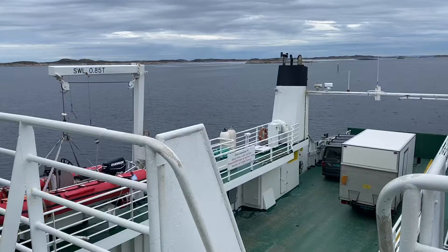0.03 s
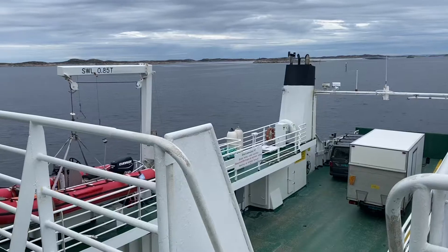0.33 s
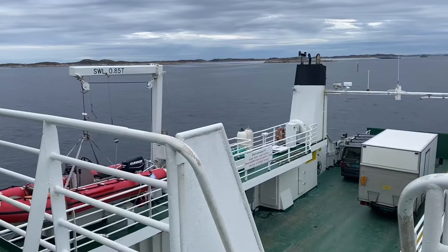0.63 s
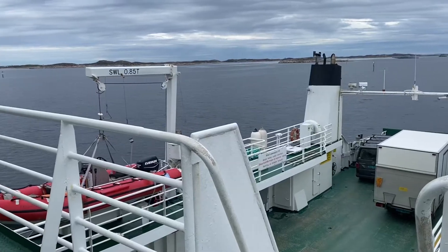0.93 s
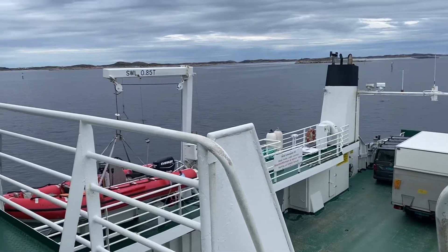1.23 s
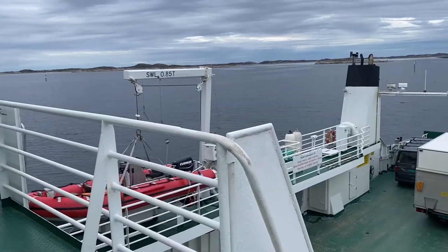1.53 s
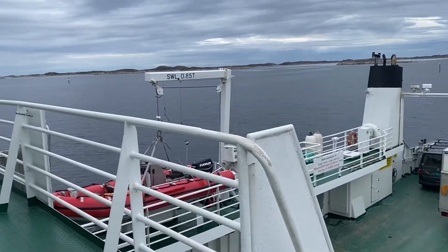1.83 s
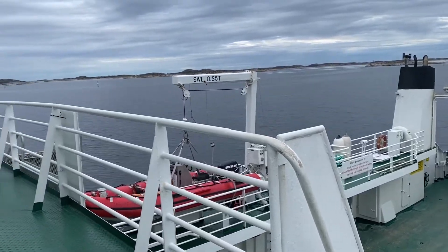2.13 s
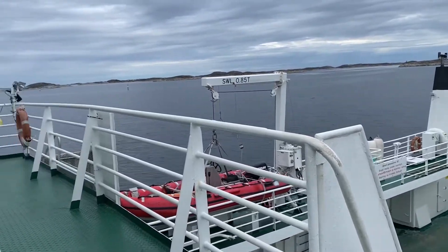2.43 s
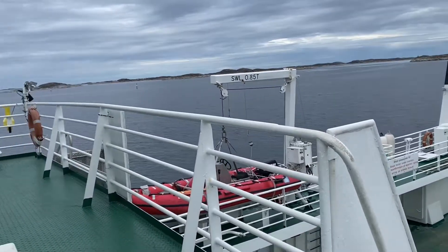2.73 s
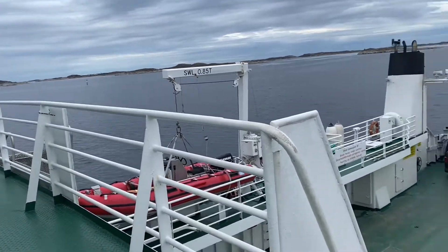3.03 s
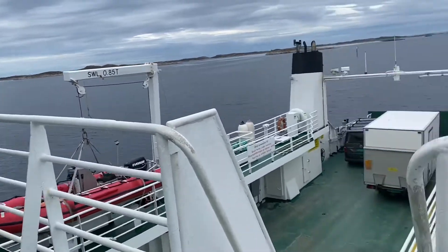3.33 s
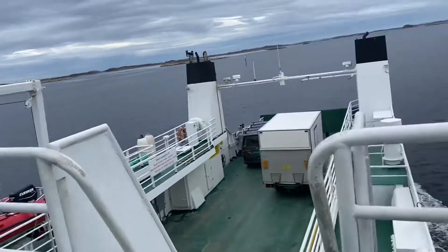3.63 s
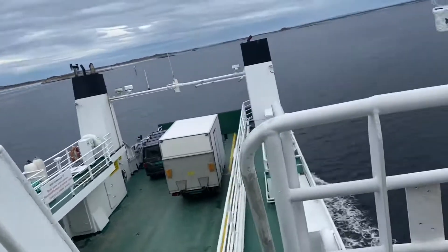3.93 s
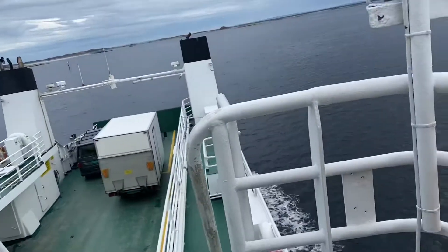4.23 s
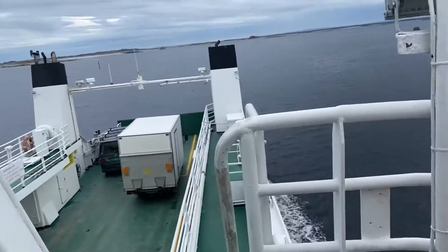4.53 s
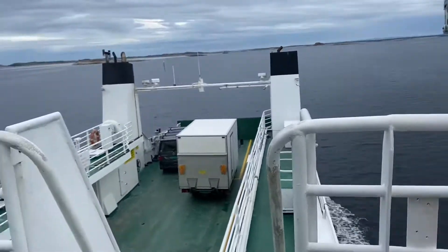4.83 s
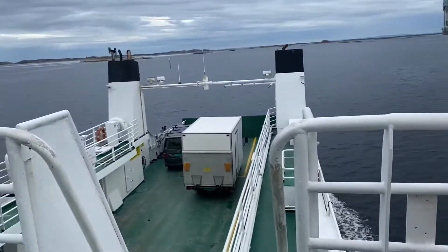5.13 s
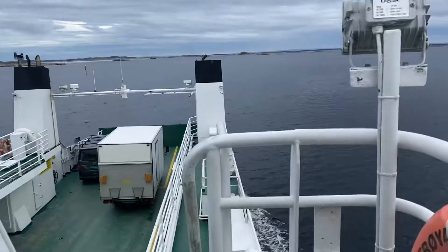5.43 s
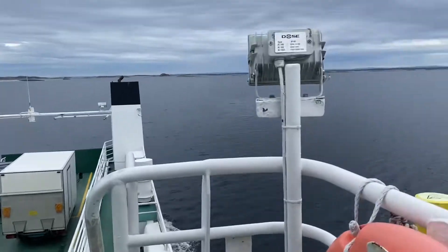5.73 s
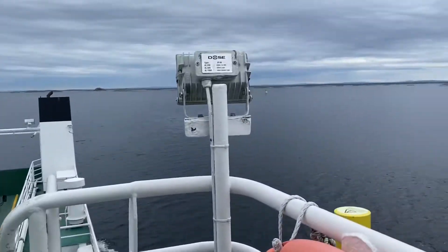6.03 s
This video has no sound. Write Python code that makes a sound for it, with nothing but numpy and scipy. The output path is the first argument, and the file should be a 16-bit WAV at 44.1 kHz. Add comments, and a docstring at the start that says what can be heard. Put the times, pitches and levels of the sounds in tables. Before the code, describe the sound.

Wind buffets the microphone on an open ship deck, with one hard rasping gust, above a low engine drone and rushing water.

```python
"""Windy deck of a car ferry

Engines drone, the bow wash hisses and ventilators roar; after three seconds the hand-held camera
turns to the sea and the roar falls away. Wind rumbles, flutters and slaps on the microphone ports,
and one hard gust rasps across the left one. Near the end something far off chirps faintly five times."""
import sys
import numpy as np
from scipy.fft import rfft, irfft, next_fast_len
from scipy.io import wavfile
from scipy.ndimage import uniform_filter1d, minimum_filter1d, map_coordinates

SR = 44100
rng = np.random.default_rng(int(sys.argv[2]) if len(sys.argv) > 2 else 0)


def transcribe(u):
    """Save the signal u as a 16-bit wav file named by the first command-line argument.

    u: samples, shape (n,) or (channels, n), limited to [-1, 1]; the rate is SR.
    q: integer samples, one column per channel.
    """
    v = np.clip(np.atleast_2d(u).T, -1, 1)
    q = np.round(v * 32767).astype(np.int16)
    wavfile.write(sys.argv[1], SR, q)


N = 277080
TIME = np.arange(N) / SR

# Left-right likeness of the ship's noise. Each row: frequency in Hz, coherence.
SHIP_COHERENCE = [(60, 0.056), (400, 0.29), (1300, 0.026), (2400, 0.63), (4400, 0.28), (8000, 0.25),
                  (14000, -0.16)]


def amp(db):
    """Decibels to gain."""
    return 10 ** (np.asarray(db) / 20)


def unit(x):
    """Scale to rms 1."""
    return x / np.sqrt(np.mean(x ** 2) + 1e-20)


def along(points, hz):
    """Read (Hz, value) points on a log axis."""
    knots_hz, values = np.transpose(points)
    return np.interp(np.log(hz + 1), np.log(knots_hz + 1), values)


def curve(points):
    """Read (seconds, value) points at every sample."""
    return np.interp(TIME, *np.transpose(points))


def bell(peak_s, half_width_s):
    """Gaussian swell, 1/e at the half-width."""
    return np.exp(-np.minimum(((TIME - peak_s) / half_width_s) ** 2, 50))


def wobble(knots_per_s):
    """Smooth random curve, rms near 1."""
    return map_coordinates(rng.standard_normal(N // 8), [TIME * knots_per_s + 2], mode="wrap")


def tone(hz):
    """Sine following a per-sample frequency."""
    return np.sin(2 * np.pi * np.cumsum(hz) / SR)


def filtered(x, response):
    """Apply a gain given as a function of Hz."""
    size = next_fast_len(N + 8192)
    return irfft(rfft(x, size) * response(np.fft.rfftfreq(size, 1 / SR)), size)[..., :N]


def resonance(x, centre_hz, width_hz):
    """Pass one narrow band."""
    return filtered(x, lambda hz: 1 / (1 + (2 * (hz - centre_hz) / width_hz) ** 2))


def coloured(x, spectrum):
    """Shape by (Hz, dB) points; rms 1."""
    return unit(filtered(x, lambda hz: amp(along(spectrum, hz))))


def noise_pair(coherence):
    """White noise for two ports from (Hz, coherence) points."""
    def mid_side_gains(hz):
        angle = np.arccos(np.clip(along(coherence, hz), -1, 1)) / 2
        return np.array([np.cos(angle), np.sin(angle)])
    mid, side = filtered(rng.standard_normal((2, N)), mid_side_gains)
    return np.array([mid + side, mid - side])


def steadied(x, window_s):
    """Even out swells slower than the window."""
    power = uniform_filter1d(np.mean(x ** 2, axis=0), max(int(window_s * SR), 8))
    return x / np.sqrt(np.abs(power) + 0.0066)


def wind(usual_db=-25.5, rumble_db=-25, rumble_db_per_db=0.41, eddy_top_hz=507):
    """Unsteady wind drives a low rumble and a lumpy flutter; big eddies add rumble and dull puffs."""
    # Heard wind level between gusts, ducking briefly after the loud ones.
    # Each row: time in seconds, level in dB.
    level = [(0.1, -31), (0.5, -25), (0.9, -32), (1.3, -24.5), (2.0, -27.5), (2.55, -24), (2.88, -28),
             (3.5, -22.5), (3.74, -30), (3.9, -31.5), (4.19, -27.5), (4.235, -32), (4.28, -32.5),
             (4.63, -27), (4.7, -33.5), (4.8, -28), (5.15, -38), (5.5, -42.5), (5.95, -35.5), (6.28, -37.5)]
    # Spectra. Each row: frequency in Hz, relative density in dB.
    rumble_spectrum = [(15, -45), (26, -35), (40, -8), (58, -0.5), (100, -4.5), (160, -7.5), (260, -20),
                       (500, -25), (3000, -120)]
    flutter_spectrum = [(25, -29), (120, -2.5), (220, 0.5), (450, -4.5), (750, -8), (1100, -17.5),
                        (1600, -27), (3000, -42), (12000, -120)]

    def churn():
        lumps = amp(2 * wobble(70) + 3 * wobble(330))
        return lumps * noise_pair([(120, 0.66), (380, 0.92), (700, 0.69), (1200, 0.44)])

    level_db = curve(level)
    rumble_swell, puff_swell = eddy_swells()
    rumble_gain = amp(rumble_db + rumble_db_per_db * (level_db - usual_db) + 3.5 * wobble(21.94))
    flutter_gain = amp(level_db + 2.87 * wobble(21.875))
    rumble = coloured(noise_pair([(60, 0.6), (150, 0.44)]), rumble_spectrum)
    rumble = steadied(rumble, window_s=0.088)
    flutter = steadied(coloured(churn(), flutter_spectrum), window_s=0.086)
    dull_churn = filtered(churn(), lambda hz: 1 / (1 + (hz / eddy_top_hz) ** 4))
    puffs = steadied(coloured(dull_churn, flutter_spectrum), window_s=0.041)
    return np.hypot(rumble_gain, rumble_swell) * rumble + flutter_gain * flutter + puff_swell * puffs


def eddy_swells(half_width_s=0.024, gain_db=2.5):
    """Rumble and puff gains as big soft eddies roll over the ports."""
    # Each row: peak time in seconds, rumble and puff levels in relative dB.
    eddies = [(0.152, -21, -31), (0.28, -44, -33), (0.467, -22, -25.5), (0.59, -18, -26.5),
              (0.655, -21, -29), (1.02, -30, -26), (1.235, -23.5, -30), (1.34, -19.5, -45),
              (1.431, -35, -25), (1.678, -24, -21.5), (2.17, -21.5, -35), (2.36, -18.5, -33),
              (2.45, -21, -34), (2.55, -19.5, -33), (2.8, -25.5, -33), (3.115, -26, -24),
              (3.236, -19.5, -19), (3.81, -26, -30), (3.87, -16.5, -31), (4.308, -21.5, -23.5),
              (4.48, -39, -27.5), (4.6, -15.5, -34), (4.845, -19.5, -38), (5.225, -21.5, -32),
              (5.36, -22.5, -42), (5.754, -22.5, -28), (5.96, -28, -27), (6.023, -23, -33),
              (6.254, -23.5, -31.5)]
    return amp(gain_db) * sum(amp([[rumble_db], [puff_db]]) * bell(peak_s, half_width_s)
                              for peak_s, rumble_db, puff_db in eddies)


def gusts(edge_s=0.0033, thump_sag_db_per_s=51, rasp_sag_db_per_s=38, tear_build_s=0.037):
    """Gusts hit the ports squarely and spend themselves, the thump faster than the rasp."""
    # Each row: start and length in seconds, thump top in Hz, thump and rasp levels in dB.
    hits = [(0.328, 0.045, 500, -20, -53), (0.567, 0.018, 626, -17.5, -33), (0.606, 0.028, 555, -16, -42),
            (0.753, 0.045, 720, -23.5, -52), (1.102, 0.081, 496, -22, -57), (1.298, 0.012, 850, -19, -28),
            (1.343, 0.016, 900, -20, -42), (1.482, 0.022, 820, -20.5, -33), (1.753, 0.023, 710, -16, -35),
            (1.789, 0.03, 830, -18, -36), (2.26, 0.0052, 1060, -18, -23), (2.277, 0.0056, 900, -12, -27),
            (2.366, 0.038, 786, -19.5, -44), (2.643, 0.029, 830, -22, -41), (2.935, 0.013, 700, -18, -48),
            (3.585, 0.013, 1020, -14, -24), (3.6, 0.016, 895, -13, -28), (3.615, 0.014, 880, -6.5, -14.5),
            (3.631, 0.017, 930, -9.5, -14), (4.152, 0.038, 910, -15.5, -30), (4.272, 0.032, 800, -24, -44),
            (4.364, 0.01, 965, -24, -29), (4.455, 0.0056, 940, -24, -34), (4.468, 0.021, 900, -23, -34),
            (4.536, 0.025, 980, -20, -35), (4.572, 0.04, 566, -18, -34), (4.604, 0.049, 980, -19, -29),
            (4.66, 0.08, 900, -33, -36.5), (4.763, 0.034, 940, -13.5, -17.5),
            (4.834, 0.018, 800, -19.5, -27), (4.845, 0.026, 950, -16.5, -13.5),
            (4.862, 0.2263, 880, -15, -10), (5.138, 0.025, 895, -26.5, -27), (5.176, 0.012, 900, -37, -31),
            (5.21, 0.018, 1060, -26, -39), (5.294, 0.007, 860, -24, -30), (5.335, 0.02, 910, -23, -34),
            (5.444, 0.0054, 1050, -29, -44), (5.741, 0.018, 1000, -31, -45),
            (6.085, 0.0089, 1046, -40, -40)]
    rasp_power, hardness = np.zeros((2, N))
    thumps = np.zeros((2, N))
    lumps = amp(2.85 * wobble(260))
    churn = lumps * noise_pair([(100, 0.98), (450, 0.62), (900, 0.35), (1800, 0.3)])
    for start_s, length_s, top_hz, thump_db, rasp_db in hits:
        on = np.abs(TIME - start_s - length_s / 2) < length_s / 2 + 0.03
        age_s = TIME[on] - start_s
        gate = np.clip(0.5 + np.minimum(age_s, length_s - age_s) / edge_s, 0, 1)
        thumps[:, on] += amp(thump_db - thump_sag_db_per_s * age_s) * thump(churn[:, on], gate, top_hz)
        rasp_power[on] += (gate * amp(rasp_db - rasp_sag_db_per_s * age_s)) ** 2
        hardness[on] += gate ** 2 * amp(rasp_db) * np.clip(age_s / tear_build_s, 0, 1)
    return thumps + np.sqrt(rasp_power) * rasp(lumps, hardness)


def thump(churn, gate, top_hz, reference_top_hz=788):
    """One gust's pressure lumps, higher for a faster gust; rms 1 while the gate is open."""
    # Spectrum at the reference top. Each row: frequency in Hz, relative density in dB.
    spectrum = [(20, -52), (70, 7.5), (200, 5), (500, 4), (780, 0.5), (1100, -10.5), (1500, -26.5),
                (2100, -35), (3000, -42), (6000, -49), (14000, -100)]
    size = next_fast_len(len(gate))
    hz = np.fft.rfftfreq(size, 1 / SR)
    response = amp(along(spectrum, hz * reference_top_hz / top_hz))
    pressure = gate * irfft(rfft(churn, size) * response, size)[:, :len(gate)]
    return pressure / np.sqrt(np.sum(pressure ** 2) / 2 / np.sum(gate ** 2))


def rasp(lumps, hardness, tear_db=-9, lee_lead_s=0.00023):
    """Flow crackles, mostly on the left port; in a hard gust it tears away in millisecond spurts."""
    # Spectra. Each row: frequency in Hz, relative density in dB.
    rasp_spectrum = [(100, -58), (350, -12), (750, 0.5), (1200, 4), (1600, 2), (2100, -8), (3100, -19),
                     (4200, -45), (5500, -43), (7000, -44), (9000, -58), (14000, -95)]
    tear_spectrum = [(900, -21), (2200, 7), (3300, 1.5), (4300, -6), (5500, -15.5), (7200, -22),
                     (8800, -43), (13000, -83)]
    # Path to the sheltered right port. Each row: frequency in Hz, gain in dB.
    lee = [(600, 3.5), (950, -3), (1450, -16.5), (2200, -15.5), (4000, -33)]
    crackle = lumps * amp(3 * wobble(1700)) * rng.standard_normal((1, N))
    crackle = steadied(coloured(crackle, rasp_spectrum), window_s=0.014)[0]
    spurts = amp(10.5 * np.tanh(wobble(780) - 0.5)) * rng.standard_normal((1, N))
    tear = steadied(coloured(spurts, tear_spectrum), window_s=0.043)[0]
    left = crackle + amp(tear_db) * np.sqrt(hardness / hardness.max()) * tear
    right = filtered(left, lambda hz: amp(along(lee, hz)) * np.exp(2j * np.pi * hz * lee_lead_s))
    return np.array([left, right])


def slaps(half_width_cycles=0.5, right_lead_s=0.00028, left_bias_db=1):
    """A sharp eddy strikes as one quick push and pull of air, right port first."""
    # Each row: time in seconds, pitch in Hz, envelope peak in dB averaged over both ports.
    strikes = [(0.529, 537, -9.5), (0.779, 334, -11), (1.18, 360, -13), (1.301, 520, -19),
               (1.49, 385, -8.5), (1.667, 269, -11), (1.699, 373, -11), (1.766, 397, -8), (1.941, 437, -5),
               (2.073, 510, -12.5), (2.262, 476, -5.5), (2.28, 390, -5.5), (2.472, 440, -5.5),
               (2.482, 444, -1), (2.524, 780, -14), (2.704, 397, -7.5), (2.902, 298, -8.5),
               (2.933, 470, -7), (3.638, 1700, -13), (4.17, 633, -5.5), (4.34, 600, -9),
               (4.458, 400, -14.5), (4.545, 460, -11), (4.608, 533, -6), (4.635, 590, -3),
               (4.894, 2600, -16), (4.937, 2800, -14), (4.951, 2700, -17), (5.147, 530, -24),
               (5.297, 310, -15.5)]
    out = np.zeros((2, N))
    for (peak_s, hz, db), phase in zip(strikes, rng.uniform(0, 2 * np.pi, len(strikes))):
        on = np.abs(TIME - peak_s) < 0.02
        cycles = hz * (TIME[on] - peak_s + right_lead_s * np.array([[-0.5], [0.5]]))
        envelope = amp(db) * np.exp(-(cycles / half_width_cycles) ** 2)
        out[:, on] += envelope * np.sin(2 * np.pi * cycles + phase)
    return out * amp([[left_bias_db], [-left_bias_db]])


def engines(sway_db=1.5):
    """Exhaust orders drone, each a narrow band wavering in the moving air."""
    # Each row: centre and width in Hz, relative level in dB.
    orders = [(76.8, 4.4, -34), (171.6, 12.6, -31.5), (275, 20.4, -39)]
    # Drone reaching the camera. Each row: time in seconds, gain in dB.
    reach = [(0, 0.5), (0.9, 2), (1.2, 7), (1.8, 5.5), (3.0, 5), (3.5, 9.5), (3.9, 1), (4.7, -6.5),
             (5.4, -1.5)]
    drone = np.zeros((2, N))
    for centre_hz, width_hz, db in orders:
        band = resonance(noise_pair([(100, 0.3)]), centre_hz, width_hz)
        drone += amp(db + sway_db * wobble(9)) * steadied(unit(band), window_s=0.76)
    return drone * amp(curve(reach))


def deck():
    """Ventilators give way to bow wash as the camera turns; the level dips briefly after the hard gust."""
    # Airborne ship noise. Each row: time in seconds, gain in dB.
    level = [(0, -45), (2.95, -44.5), (3.4, -39), (3.7, -43), (4.8, -44), (5.12, -50), (5.3, -44),
             (5.6, -46.5), (6.28, -44)]
    # Each row: time in seconds, ventilator share of the power crossfade from 0 to 1.
    facing = [(0, 0.68), (3.0, 0.77), (3.2, 0.02), (3.8, 0.04), (6.28, 0)]
    share = curve(facing)
    return amp(curve(level)) * (np.sqrt(share) * ventilators() + np.sqrt(1 - share) * bow_wash())


def ventilators(roar_db=12, whine_db=-1, waver_hz=4.2):
    """Air roars through ringing ducts while the fans whine."""
    # Each row: frequency in Hz, relative density in dB.
    roar_spectrum = [(60, -2), (200, 4.5), (700, 4.5), (1200, -0.5), (2450, -7), (2580, -12.5),
                     (2800, -10.5), (4200, -13), (5000, -19.5), (7200, -22), (8500, -36), (9600, -18.5),
                     (11000, -23.5), (11900, -49), (13700, -32), (15000, -50)]
    # Each row: pitch in Hz, relative level in dB.
    whines = [(1637, -8.5), (1746, -11), (1868, -12), (3042, -18), (4054, -20)]
    out = amp(roar_db) * coloured(plating(noise_pair(SHIP_COHERENCE)), roar_spectrum) + ducts()
    for hz, db in whines:
        out += amp(whine_db + db + 4.3 * wobble(3.76)) * tone(hz + waver_hz * wobble(12))
    return out


def ducts(sway_db=2):
    """Passing air rings the ducts, each swelling and sinking by itself."""
    # Each row: centre and width in Hz, relative gain in dB.
    modes = [(1866, 47, 0), (2176, 100, 0), (2335, 72, -2.5), (2430, 88, -1.5), (3080, 78, -3.5),
             (3920, 150, -10.5), (4100, 170, -9), (5440, 290, -16), (6880, 510, -14)]
    air = plating(noise_pair(SHIP_COHERENCE))
    return unit(sum(amp(db + sway_db * wobble(4.89)) * resonance(air, centre_hz, width_hz)
                    for centre_hz, width_hz, db in modes))


def bow_wash(gain_db=15, sway_db=1.95):
    """Bow wash and hull noise from all round."""
    # Each row: frequency in Hz, relative density in dB.
    spectrum = [(30, -3), (70, 27.5), (170, 7.5), (400, 4.5), (850, 3.5), (1350, -10), (1780, -3),
                (2050, -8.5), (2400, -9), (3100, -15.5), (5000, -21), (7000, -25), (8500, -33.5),
                (10200, -25), (12000, -40), (13700, -30.5), (15000, -48)]
    surge = amp(gain_db + sway_db * wobble(9.2))
    return surge * coloured(plating(noise_pair(SHIP_COHERENCE)), spectrum)


def plating(x, count=14, longest_s=0.035, echo_db=-15, dull_hz=5500):
    """Steel walls and deck return weak, duller copies that comb the sound."""
    delays = (rng.uniform(0.003, longest_s, count) * SR).astype(int)
    echoes = sum(np.roll(x, delay, axis=-1) for delay in delays)
    return x + amp(echo_db) * filtered(echoes, lambda hz: 1 / np.hypot(1, hz / dull_hz))


def brief_tones(waver_hz=16):
    """Brief wavering tones: a high ventilator whine swells, and the wind hoots low twice."""
    # Each row: peak time and half-width in seconds, pitch in Hz, peak level in dB.
    swells = [(0.95, 0.24, 3050, -55), (1.14, 0.05, 457, -23), (3.46, 0.069, 283.3, -21.5)]
    return sum(amp(db) * bell(peak_s, half_width_s) * tone(hz + waver_hz * wobble(60))
               for peak_s, half_width_s, hz, db in swells)


def chirps(pitch_hz=1705, roughness=0.026, linger_db=-8, linger_s=0.11):
    """Far, slightly rough rising squeaks with one overtone; the tone lingers between steel walls."""
    # Each row: peak time in seconds, tone and overtone levels in dB.
    squeaks = [(5.275, -45, -43.5), (5.47, -42.5, -54), (5.68, -42.5, -60), (5.888, -41, -60),
               (6.097, -44.5, -50)]
    out = np.zeros(N)
    for peak_s, tone_db, overtone_db in squeaks:
        age_s = TIME - peak_s
        glide = 1 + 0.036 * np.tanh(age_s / 0.018)
        hz = pitch_hz * (glide + roughness * wobble(300))
        swell = bell(peak_s, half_width_s=0.015)
        tail = amp(linger_db) * (age_s > 0) * np.exp(-np.abs(age_s) / linger_s)
        out += amp(tone_db) * np.maximum(swell, tail) * tone(hz)
        out += amp(overtone_db) * swell * tone(2 * hz)
    return out


def rustles(grain_db=2):
    """Faint grainy rustles as the camera turns, and a soft sniff-like hiss near the end."""
    # Each row: peak time and half-width in seconds, level in dB.
    swishes = [(3.02, 0.084, -51), (3.31, 0.05, -56), (3.495, 0.008, -50), (3.545, 0.01, -49.5),
               (3.745, 0.007, -53.5), (3.835, 0.007, -56), (5.33, 0.1, -53.5)]
    # Each row: frequency in Hz, relative density in dB.
    spectrum = [(1500, -30), (4000, 6), (7000, 4), (10500, -2), (12000, -10), (15000, -15)]
    envelope = sum(amp(db) * bell(peak_s, half_width_s) for peak_s, half_width_s, db in swishes)
    hiss = amp(grain_db * wobble(350)) * noise_pair([(5000, 0.35)])
    return envelope * coloured(hiss, spectrum)


def scene():
    """Ship, sea and wind in stereo."""
    return engines() + deck() + wind() + gusts() + slaps() + brief_tones() + rustles() + chirps()


def record(dry, opens_s=0.073, fade_in_s=0.057, fade_out_s=0.003, ceiling=0.93, top_hz=15100):
    """Microphone chain: delayed fade-in, quick fade-out, peak limiter, steep low-pass."""
    live = dry * np.clip((TIME - opens_s) / fade_in_s, 0, 1)
    live *= np.minimum(1, (TIME[-1] - TIME) / fade_out_s)
    needed_gain = np.minimum(1, ceiling / (np.abs(live).max(axis=0) + 1e-9))
    gain = uniform_filter1d(minimum_filter1d(needed_gain, size=400), size=300)
    return filtered(live * gain, lambda hz: hz < top_hz)


dry = scene()
out = record(dry)
transcribe(out)
```